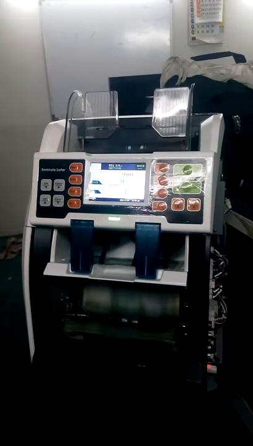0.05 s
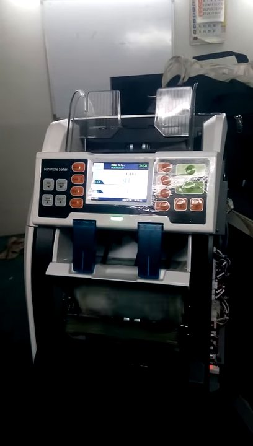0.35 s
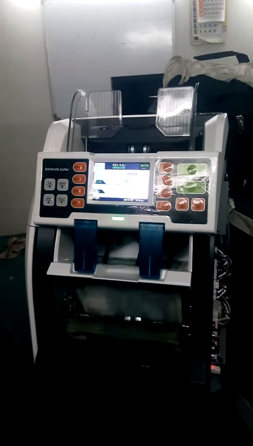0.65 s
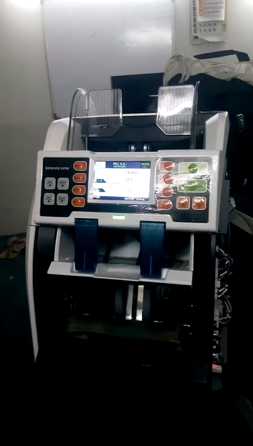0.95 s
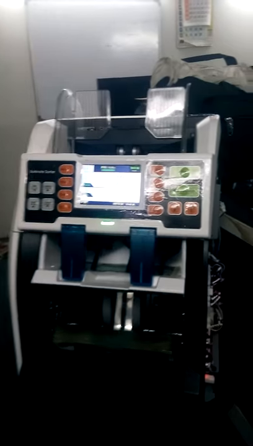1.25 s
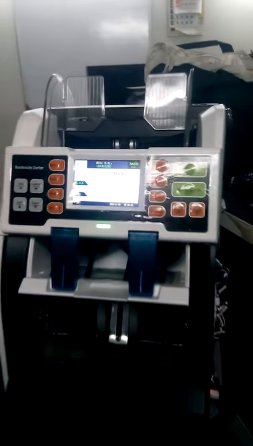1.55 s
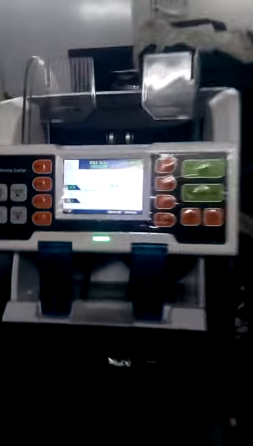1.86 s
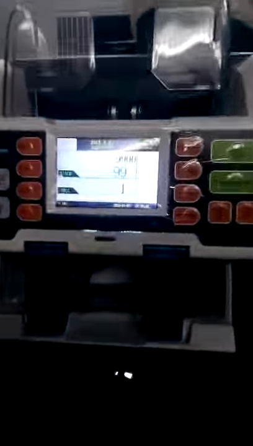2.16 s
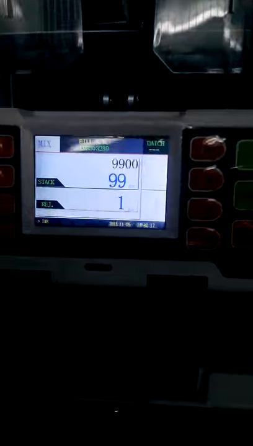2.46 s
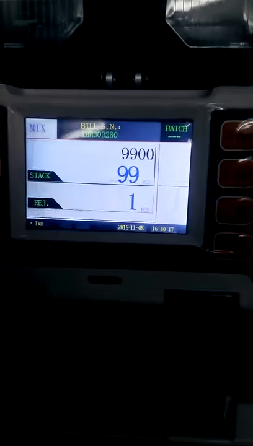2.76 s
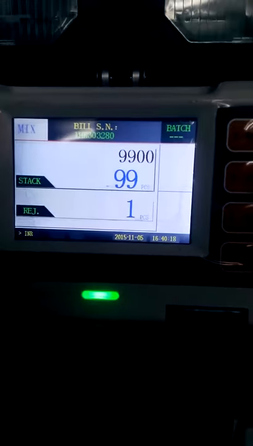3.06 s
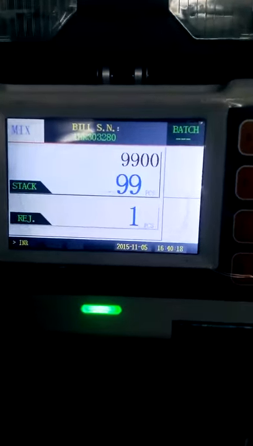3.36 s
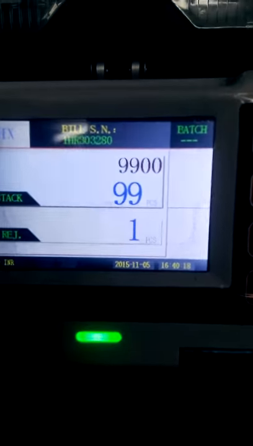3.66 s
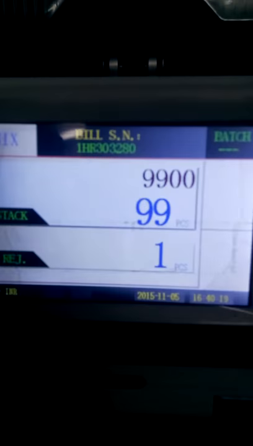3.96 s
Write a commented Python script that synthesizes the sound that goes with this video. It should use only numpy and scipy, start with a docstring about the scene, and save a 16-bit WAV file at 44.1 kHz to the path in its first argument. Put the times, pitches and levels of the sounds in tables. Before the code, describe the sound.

Close to the microphone, a banknote counting machine riffles through the end of a stack, paper flicking and snapping over a motor whine. It whirs on briefly without notes, stops quickly, and a quiet, low room hum remains.

```python
"""A banknote sorter pulls the last notes of a stack through its rollers, twelve a second, up close.
Each note thumps the housing in the feeder, rustles along with flicking edges and snaps into the stacker.
The whining motor and whirring belts run on empty, then brake; a wheel coasts to rest with faint rubs
and leaves the hum of a small room."""
import sys
import numpy as np
from scipy import signal
from scipy.fft import rfft, irfft, next_fast_len
from scipy.io import wavfile

SR = 44100
rng = np.random.default_rng(int(sys.argv[2]) if len(sys.argv) > 2 else 0)


def to_wav(s):
    """Save 16-bit WAV."""
    ch = np.atleast_2d(s).T  # columns
    pcm = np.round(np.clip(ch, -1, 1) * 32767)  # PCM
    wavfile.write(sys.argv[1], SR, pcm.astype(np.int16))


N = 176400
T = np.arange(N) / SR
PADDED = next_fast_len(N + SR // 2)
HZ = np.fft.rfftfreq(PADDED, 1 / SR)
BRAKE_S = 1.775

# blows of the feed roller: t/s, level/dB
FEED_BLOWS = [(0.053, 2.5), (0.092, 0), (0.125, -1), (0.174, 1.5), (0.255, 0.5), (0.301, 1.5), (.333, 0.5),
              (.412, 1), (0.454, -9), (.497, 3), (0.537, -6), (0.574, -2.5), (0.611, -3), (.657, 3),
              (0.702, 6), (.740, 2), (0.784, -3), (.864, 0), (0.976, -6)]
# paper sliding through the rollers: t/s, level/dB
PAPER_LEVEL = [(0, -20), (.25, -19.5), (.5, -18.5), (.7, -19.5), (.83, -18.5), (.88, -21), (.908, -27.5),
               (.945, -22), (.985, -31), (1.02, -59), (1.08, -107)]
# the machine's stereo image: f/Hz, then coherence/0-1, left lead/rad, left minus right/dB in turn
NEAR_COHERENCE = [(200, .997), (350, .975), (620, .92), (1000, .78), (1600, .68), (2800, .65), (4200, .3),
                  (5600, .45), (7300, .55), (10000, .62), (15700, .47)]
NEAR_PHASE = [(200, 0), (430, 0.62), (780, 1.26), (1210, 0.24), (2580, -1.5), (3010, -0.5), (4390, 0.5),
              (5080, 2), (6030, 3), (15700, 4)]
NEAR_BALANCE = [(200, -0.5), (350, 6), (620, 1), (1000, 1), (2600, 3.5), (4200, 2.5), (5700, 6.5),
                (7300, -3), (10000, -10), (15700, -13)]
NEAR = NEAR_COHERENCE, NEAR_PHASE, NEAR_BALANCE


def amp(db):
    """Decibels to gain."""
    return 10 ** (np.asarray(db) / 20)


def unit(x):
    """Scales to rms 1."""
    return x / np.sqrt(np.mean(x ** 2) + 1e-20)


def curve(points):
    """An automation curve over time."""
    return np.interp(T, *np.transpose(points))


def over_hz(points):
    """A curve over log frequency."""
    hz, value = np.transpose(points)
    return np.interp(np.log(HZ + 1), np.log(hz), value)


def to_hz(x):
    """Spectrum of a sound followed by silence."""
    return rfft(x, PADDED)


def to_time(z):
    """Back from a spectrum to a sound."""
    return irfft(z, PADDED)[..., :N]


def drift(rate_hz, control_hz=2000):
    """Smooth random modulation of rms 1."""
    times = np.arange(0, T[-1] + 1, 1 / control_hz)
    hz = np.fft.rfftfreq(len(times), 1 / control_hz)
    slow = irfft(rfft(rng.standard_normal(len(times))) * np.exp(-(hz / rate_hz) ** 2), len(times))
    return unit(np.interp(T, times, slow))


def burst(start, rise, decay):
    """A linear attack and an exponential decay, timed in seconds."""
    age = np.maximum(T - start, 0)
    return np.minimum(age / rise, 1) * np.exp(-np.maximum(age - rise, 0) / decay)


def crackle(spread_db, per_s=9000):
    """Two streams of dense clicks of uneven size."""
    size = amp(spread_db * np.minimum(rng.exponential(1, N), 5)) * (rng.random(N) < per_s / SR)
    return unit(size * rng.standard_normal((2, N)))


def stereo(streams, eq, image):
    """Colours two unrelated streams, if an EQ is given, and blends them into left and right."""
    a, b = to_hz(streams) * (unit(amp(over_hz(eq))) if eq else 1)
    coherence, lead, balance_db = (over_hz(table) for table in image)
    left = a * amp(balance_db)
    right = (coherence * a + np.sqrt(1 - coherence ** 2) * b) * np.exp(-1j * lead)
    return to_time(np.array([left, right]) * np.sqrt(2 / (1 + amp(2 * balance_db))))


def case(x, t60_s=.11, wet_db=-4, low_cut_hz=880):
    """Short reflections inside the plastic case, above the bass."""
    taps = rng.standard_normal((2, N)) * amp(-60 * np.minimum(T / t60_s, 5))
    taps /= np.linalg.norm(taps, axis=1, keepdims=True)
    echo = to_hz(taps) * HZ ** 2 / (HZ ** 2 + low_cut_hz ** 2)
    return to_time(to_hz(x) * (1 + amp(wet_db) * echo)) / np.sqrt(1 + amp(2 * wet_db))


def bending(x, band_hz=600, depth_db=1.6):
    """Neighbouring bands of a rustle swell and fade on their own as the paper bends."""
    spectrum, centres = to_hz(x), np.arange(1, 12) * band_hz
    bands = (to_time(spectrum * np.interp(HZ, centres, pick)) for pick in np.eye(len(centres)))
    return unit(sum(band * amp(depth_db * drift(40)) for band in bands))


def rustle(grab_db=-22, flutter_db=.93):
    """Sliding paper flutters, and swells each time the feed roller grabs."""
    # colour of sliding paper: f/Hz, level/dB
    eq = [(60, -26), (145, -15), (200, -9), (280, -3), (370, 0), (440, -15.5), (560, -6), (680, -12.5),
          (1000, -8.5), (1500, -8.5), (2000, -5.5), (2600, 0.5), (3100, -2.5), (3500, -5), (4300, -3.5),
          (5000, -8), (5700, -3.5), (6500, -15), (7400, -20.5), (10000, -18), (11800, -14.5),
          (13500, -16.5), (15700, -21)]
    grabs = sum(amp(grab_db + db) * burst(s - .002, .0017, .012) for s, db in FEED_BLOWS)
    sliding = amp(curve(PAPER_LEVEL) + flutter_db * drift(88))
    grain = bending(crackle(1, per_s=12000))
    return stereo(case(grain * np.hypot(sliding, grabs)), eq, NEAR)


def motor(run_hz=44.35, main_order=14, brake_db_per_s=380):
    """A clear shaft tone, wavering orders and gear whines; notes jostle the speed, the brake cuts it."""
    # shaft speed: t/s, f/Hz
    speed = [(0, 44.5), (.15, 44.8), (.25, 44.2), (.45, 44.4), (.55, 45), (.65, 44.2), (.75, 44.4),
             (1.78, 44.35), (1.86, 44)]
    # main shaft tone: t/s, level/dB
    tone_level = [(0, -37), (.3, -35.5), (.48, -34), (.61, -39), (.76, -34.5), (.9, -36), (1, -38),
                  (1.77, -38.3)]
    # weaker shaft orders: multiple, level/dB
    orders = [(16, -55), (19, -55), (20, -52), (21, -48.5), (22, -46), (23, -46), (42, -52)]
    # gear and bearing whines at running speed: f/Hz, level/dB
    whines = [(1792, -51), (2029, -51), (2240, -47), (2600, -46), (2930, -45), (3710, -48), (4362, -48)]
    load = amp(curve(PAPER_LEVEL) - PAPER_LEVEL[0][1])
    turns = np.cumsum(curve(speed) * (1 + .005 * load * drift(32))) / SR
    waver_db = (.7 + 2.5 * load) * drift(16)
    out = amp(curve(tone_level) + waver_db) * np.sin(2 * np.pi * main_order * turns) * np.ones((2, 1))
    for multiple, db in orders:
        phase = 2 * np.pi * (round(multiple) * turns + rng.random()) + .45 * drift(16)
        out += amp(db + 2.8 * drift(16)) * np.sin(phase)
    for hz, db in whines:
        phase = 2 * np.pi * hz * (turns / run_hz + .001 * np.cumsum(drift(24)) / SR)
        out += amp(db + 2 * drift(18)) * np.sin(phase + rng.uniform(-.24, 1, (2, 1)))
    brake = amp(-brake_db_per_s * np.clip(T - BRAKE_S, 0, .5))
    return np.sqrt(2) * out * brake * amp([[.5], [-.5]])


def belts():
    """Grainy whir of belts and rollers, with a few stray ticks."""
    # fader of the whir: t/s, level/dB
    whir_level = [(0, -19.5), (1, -25), (1.4, -25), (1.785, -25.5), (1.83, -39), (1.9, -46.5), (2, -65),
                  (2.3, -73), (2.6, -100)]
    # ticks and scrapes in the mechanism: t/s, level/dB, decay/s
    strays = [(.496, -17, 0.0045), (0.613, -16.5, 0.0044), (.694, -18, .004), (.782, -16, .003),
              (1.029, -21, 0.0029), (1.437, -20, .0033), (1.676, -28.5, 0.029), (1.731, -34, .012)]
    # colours of the whir and the ticks: f/Hz, level/dB
    whir_eq = [(50, -30), (130, -21), (190, 2.5), (240, -10.5), (300, -1), (380, -7.5), (450, -16),
               (550, -7.5), (700, -8.5), (1000, -11), (1300, -10), (1600, -11.5), (2300, -6.5), (2600, -5),
               (2900, -2), (3300, -4), (4300, -4.5), (4900, -5), (5700, -2), (6500, -9.5), (7400, -20),
               (10000, -17), (11800, -12), (13500, -20), (15700, -23)]
    tick_eq = [(500, -26), (3000, -12), (6000, 4), (7500, -5), (10000, -2), (11500, 4), (15700, -6)]
    whir = crackle(1.5, per_s=14000) * amp(curve(whir_level) + .09 * drift(60))
    ticks = sum(amp(db) * burst(s, .0011, decay) for s, db, decay in strays) * crackle(1.5)
    return stereo(case(whir), whir_eq, NEAR) + stereo(case(ticks), tick_eq, NEAR)


def room(hum_hz=48.6, hum_db=-50, air_db=-40, shelf_hz=1100):
    """Low rumble, a wavering mains hum and a soft hiss that starts brighter and settles."""
    # colour of the room tone: f/Hz, level/dB
    eq = [(20, -23), (35, -17), (48, 1.5), (65, -3), (100, -2), (150, -8.5), (200, -1.5), (280, -12.5),
          (360, -16), (480, -26), (700, -27), (1000, -26.5), (1300, -31), (2000, -26.5), (2800, -27.5),
          (4000, -29), (5600, -33), (7200, -43.5), (9500, -42.5), (12000, -35), (15700, -38)]
    # treble shelf on the hiss: t/s, level/dB
    shelf_level = [(0, 6), (2.3, 0), (2.7, -0.5), (3, 0.5), (3.4, -0.5), (4, 0)]
    # the room's stereo image: f/Hz, then coherence/0-1, left lead/rad, left minus right/dB in turn
    coherence = [(200, .993), (330, .93), (600, .75), (1000, .75), (2800, .6), (5500, .3), (12000, .15)]
    lead = [(150, 0), (250, 0.1), (350, 0), (600, 1.5), (1200, 0), (2700, 0.6), (5900, 2.5), (15700, 11.5)]
    balance = [(50, 3.5), (200, -0.5), (330, 5.5), (1000, 1), (2800, 4), (5500, 3), (7300, -1),
               (12000, -3.5)]
    hum = amp(hum_db + 2 * drift(8)) * np.sin(2 * np.pi * hum_hz * T + .5 * drift(8))
    noise = rng.standard_normal((2, N)) * amp(air_db + .51 * drift(3.5))
    air = stereo(noise, eq, (coherence, lead, balance))
    treble = to_time(to_hz(air) * HZ ** 2 / (HZ ** 2 + shelf_hz ** 2))
    return hum + air + treble * (amp(curve(shelf_level)) - 1)


def snaps(level_db=-15.5):
    """Each note lands in the stacker with a bright, papery snap."""
    # notes reaching the stacker: t/s, level/dB
    landings = [(0.025, 0), (.268, -9), (.351, -1), (0.431, 2), (.510, 3), (.591, 2), (.671, 2), (0.753, 5),
                (0.837, 4.5), (.918, 5)]
    # colour of a snap: f/Hz, level/dB
    eq = [(100, -22), (400, -13), (1000, -7), (2000, -5.5), (2800, 2), (4000, 4.5), (5800, 4.5),
          (7300, -14.5), (10000, -14.5), (12000, -5), (15700, -28)]
    envelope = sum(amp(level_db + db) * burst(s - .002, .0055, .008) for s, db in landings)
    return stereo(case(envelope * crackle(1.1)), eq, NEAR)


def knocks(level_db=-26):
    """The dry contact of the feed roller that starts each thump."""
    # colour of the contact: f/Hz, level/dB
    eq = [(100, -3), (200, -5), (370, -9), (460, -17), (900, 9), (1500, -13), (2300, -4), (3500, -5),
          (8000, -35), (15700, -35)]
    envelope = sum(amp(level_db + db) * burst(s - .002, .0027, .0047) for s, db in FEED_BLOWS)
    return stereo(envelope * crackle(.97), eq, NEAR)


def thumps(level_db=-26.5):
    """The feed roller sets the housing ringing, about twice for each note."""
    # modes of the housing: f/Hz, level/dB, t60/s
    modes = [(205, 1, .085), (250, -7, .038), (304, 1, .065), (367, 0, .085), (472, -11, .06)]
    out, t = np.zeros(N), T[:SR // 5]
    attack = np.minimum(t / .0027, 1)
    for s, db in FEED_BLOWS:
        first = round(s * SR)
        for hz, mode_db, t60 in modes:
            detune, phase = rng.uniform(-1.57, 1, 2)
            ring = np.sin(2 * np.pi * hz * (1 + .014 * detune) * t + phase)
            out[first:first + len(t)] += amp(db + mode_db - 60 * t / t60) * ring * attack
    pan = amp(over_hz(NEAR_BALANCE) * np.array([[.5], [-.5]]))
    return amp(level_db) * to_time(to_hz(out) * pan)


def flicks(width_hz=650, glide_hz_per_s=6300):
    """Each loose edge gives a short rasp with its own pitch, which rises as the paper tightens."""
    # flicking edges: t/s, level/dB, f/Hz
    edges = [(.080, -18, 3016), (.098, -20.5, 2087), (.210, -19.5, 2495), (.249, -18.5, 2440),
             (.269, -17, 2784), (.293, -20, 3000), (.316, -18, 3134), (.370, -20, 5680), (0.416, -19, 2620),
             (.492, -15.5, 2660), (.511, -29, 2690), (0.585, -14.5, 2780), (.677, -21, 2940),
             (.753, -15.5, 5770), (.808, -17, 3600), (0.883, -21, 3910), (.972, -19.5, 2880)]
    out, t = np.zeros((2, N)), T[:SR // 10]
    envelope = burst(0, .004, .011)[:len(t)]
    lowpass = signal.butter(2, width_hz / 2, fs=SR)
    for s, db, hz in edges:
        a, b = signal.lfilter(*lowpass, rng.standard_normal((2, 2, len(t))))
        phase = 2 * np.pi * np.cumsum(hz + glide_hz_per_s * t) / SR
        rasp = unit(a * np.cos(phase) + b * np.sin(phase))  # a noise band around the gliding pitch
        first = round(s * SR)
        out[:, first:first + len(t)] += amp(db) * envelope * rasp
    return stereo(case(out), None, NEAR)


def squeal(start_s=1.75, length_s=.25, hz=8570, wander_hz=70):
    """A faint squeal rides the braking, off to the right."""
    arch = np.sin(np.pi * np.clip((T - start_s) / length_s, 0, 1))
    phase = 2 * np.pi * np.cumsum(hz + wander_hz * drift(60)) / SR
    return amp(-65) * arch * np.sin(phase) * np.array([[.3], [2]])


def rundown(level_db=-34.5):
    """The rollers hiss briefly as they run down after the brake."""
    # colour of the slowing rollers: f/Hz, level/dB
    eq = [(300, -6), (1000, -12), (2000, -12), (2900, 0), (3900, -11), (5500, -19), (7500, -28),
          (15700, -23)]
    hiss = amp(level_db) * burst(BRAKE_S, .012, .072) * crackle(1.3)
    return stereo(case(hiss), eq, NEAR)


def wheel():
    """A wheel's thin hiss is laid bare as the machine stops; it coasts to rest with faint rubs."""
    # its steady brushing and its single rubs: t/s, level/dB
    brush_level = [(0, -37), (1.8, -46), (2, -56), (2.3, -58), (2.5, -65), (2.6, -90)]
    rubs = [(1.91, -46), (1.943, -50), (2.012, -55), (2.083, -54), (2.115, -51), (2.148, -53), (2.183, -49),
            (2.217, -48), (2.252, -51), (2.298, -51), (2.341, -46), (2.410, -49), (2.476, -49)]
    # colour of the rubbing: f/Hz, level/dB
    eq = [(2000, -33), (7000, -19), (10400, -19), (10950, -4), (11300, -1.5), (11750, -8), (12300, -9),
          (15700, -12)]
    envelope = amp(curve(brush_level)) + sum(amp(db) * burst(s - .005, .007, .008) for s, db in rubs)
    return stereo(envelope * crackle(1.2, per_s=14000), eq, NEAR)


def scene():
    """The machine in its room."""
    bed = rustle() + motor() + belts() + room()
    hits = snaps() + knocks() + thumps() + flicks()
    return bed + hits + squeal() + rundown() + wheel()


def record(dry):
    """A steep high cut takes off the very top."""
    high_cut = signal.firwin(511, 15950, window=("kaiser", 9), fs=SR)
    return signal.oaconvolve(dry, high_cut[None], "same")


dry = scene()
out = record(dry)
to_wav(out)
```